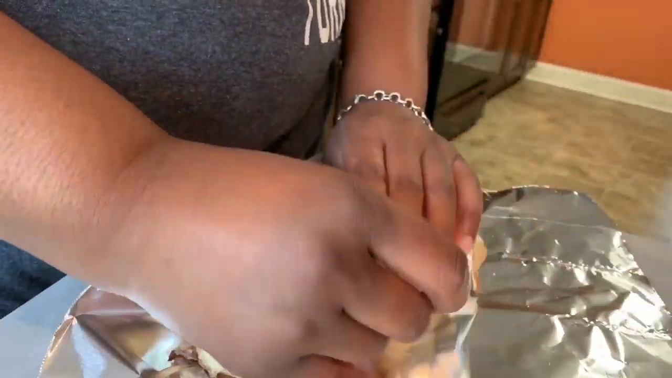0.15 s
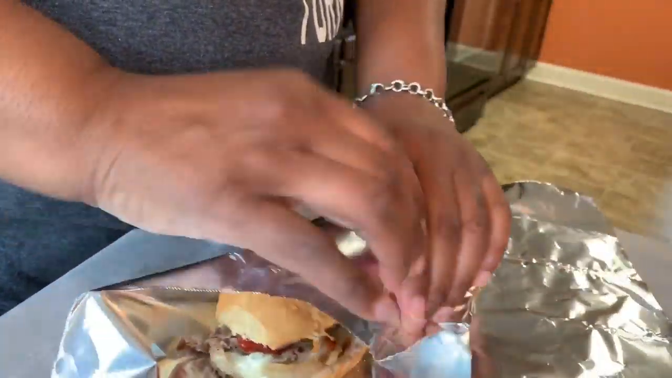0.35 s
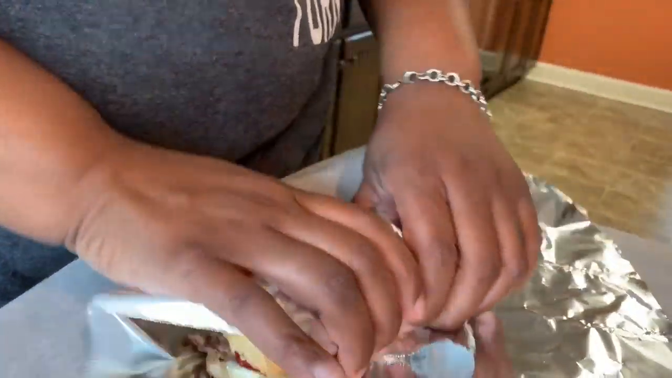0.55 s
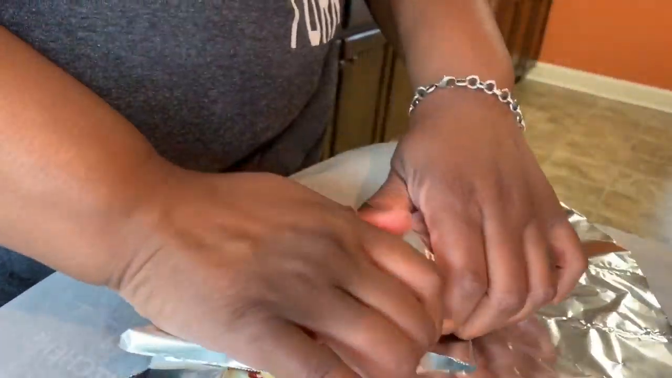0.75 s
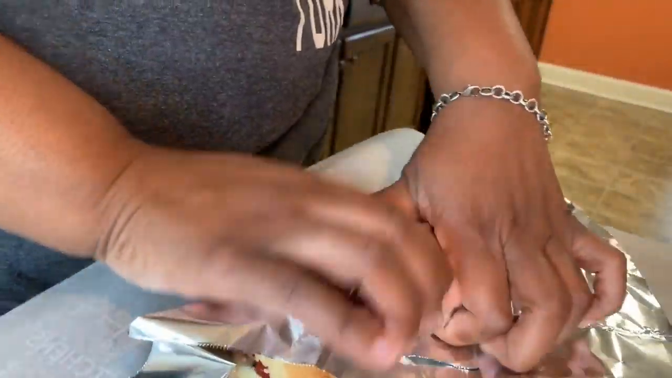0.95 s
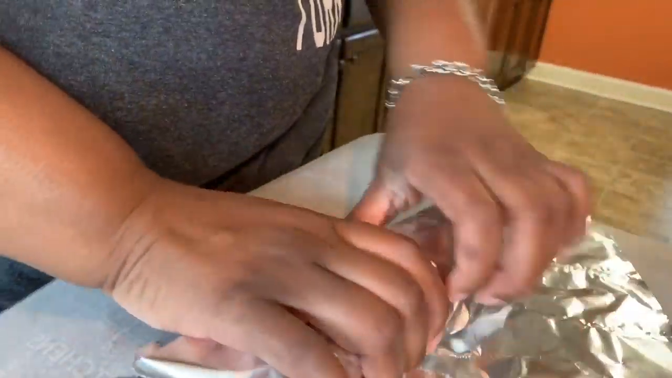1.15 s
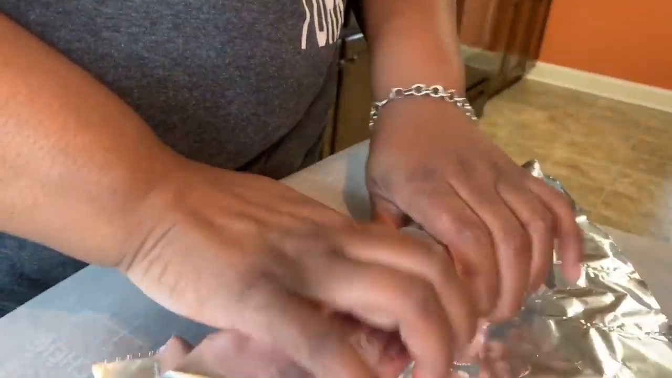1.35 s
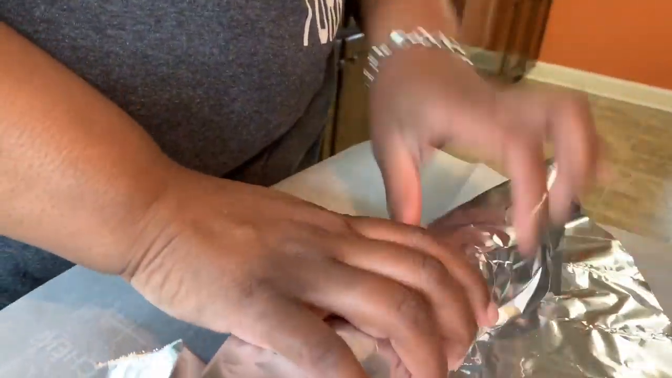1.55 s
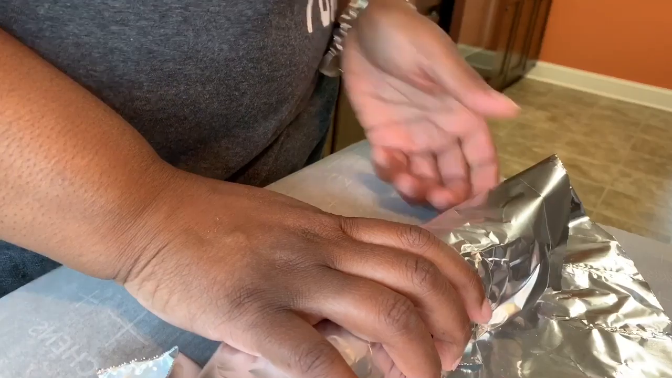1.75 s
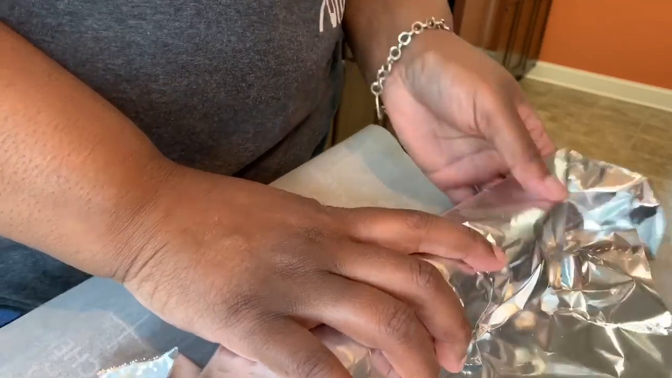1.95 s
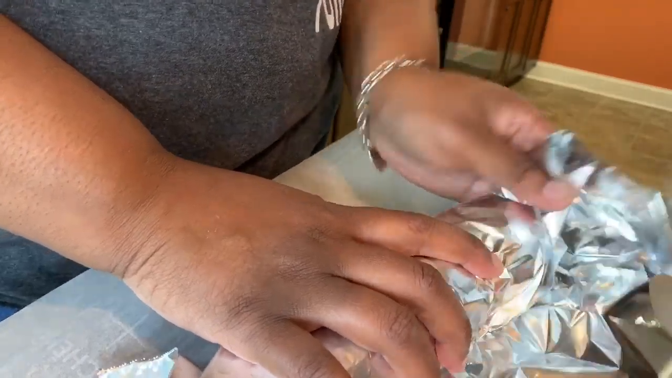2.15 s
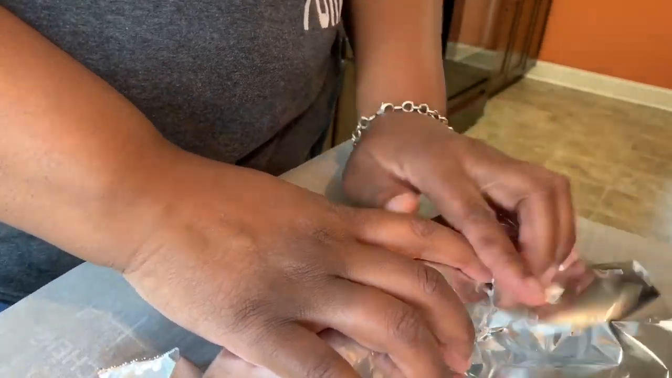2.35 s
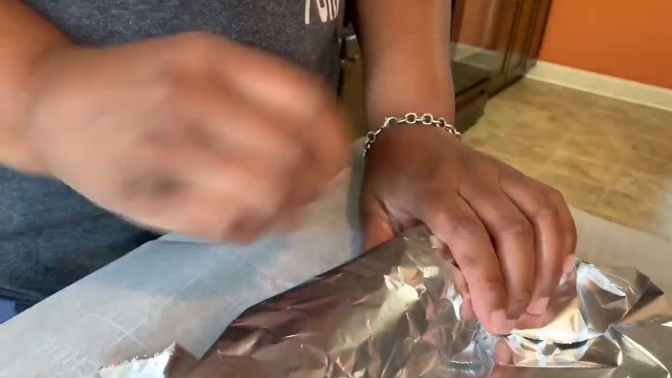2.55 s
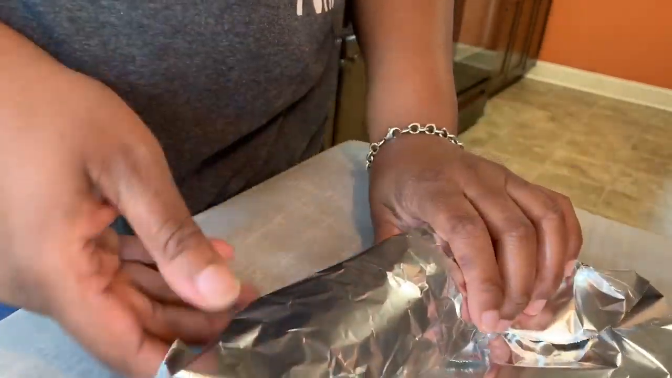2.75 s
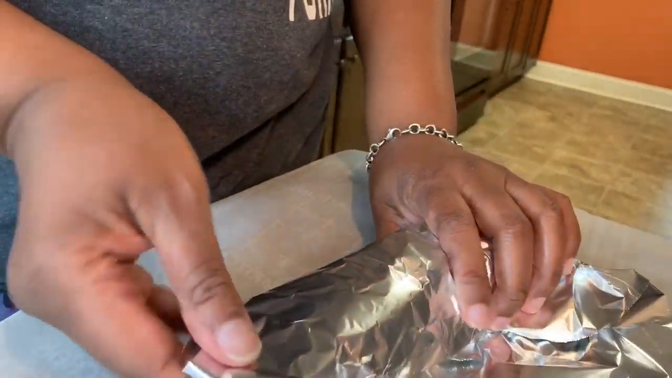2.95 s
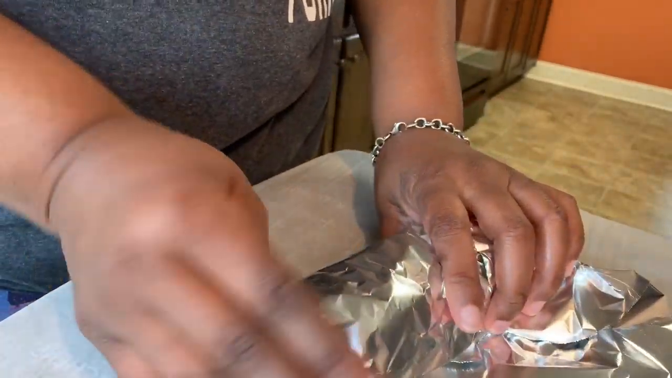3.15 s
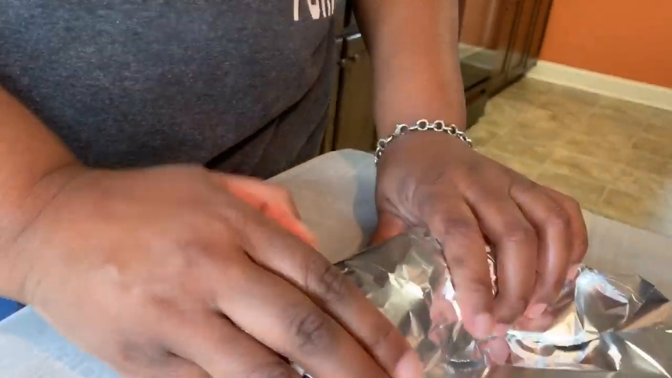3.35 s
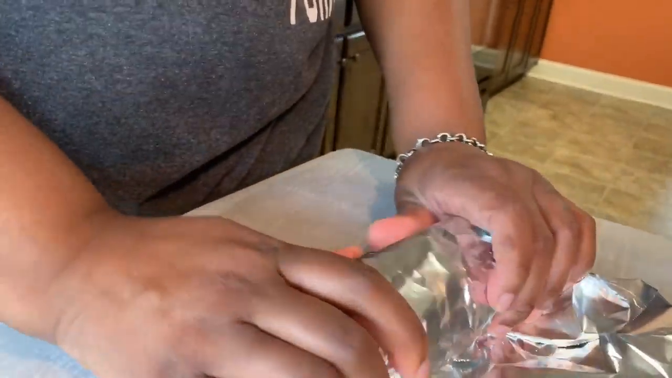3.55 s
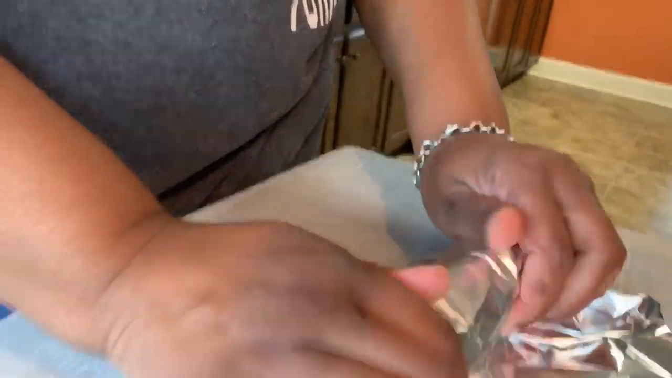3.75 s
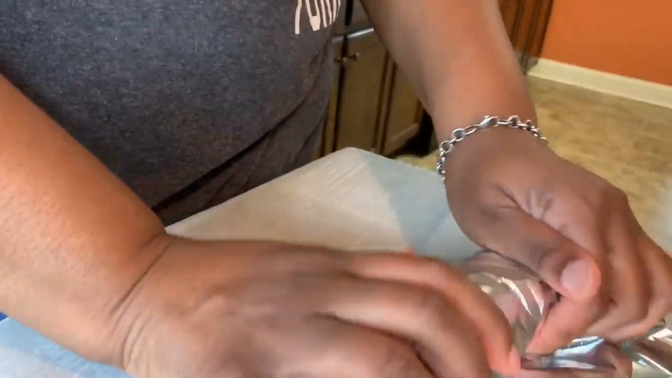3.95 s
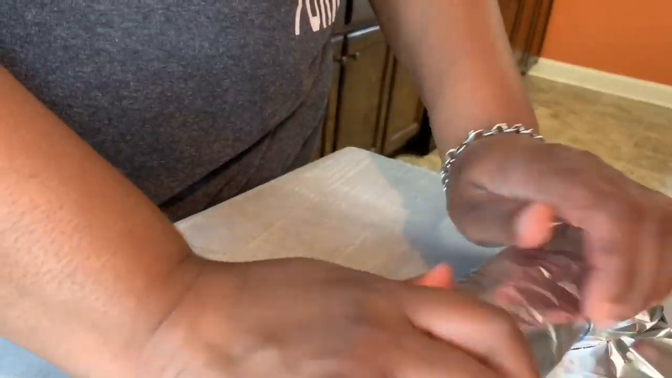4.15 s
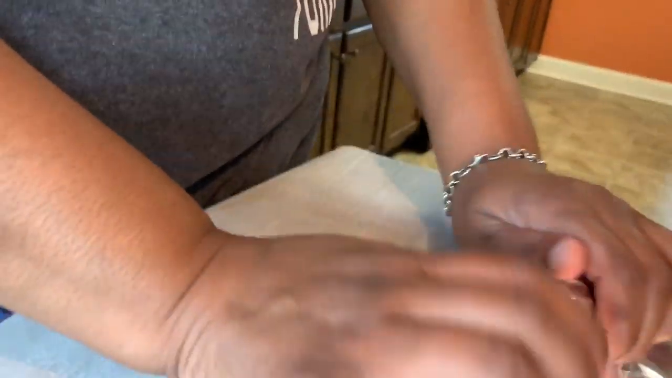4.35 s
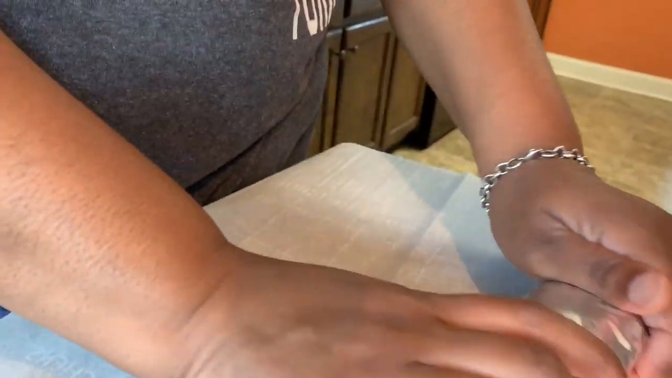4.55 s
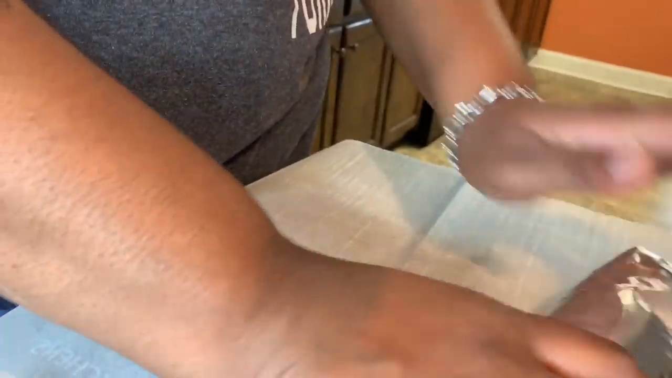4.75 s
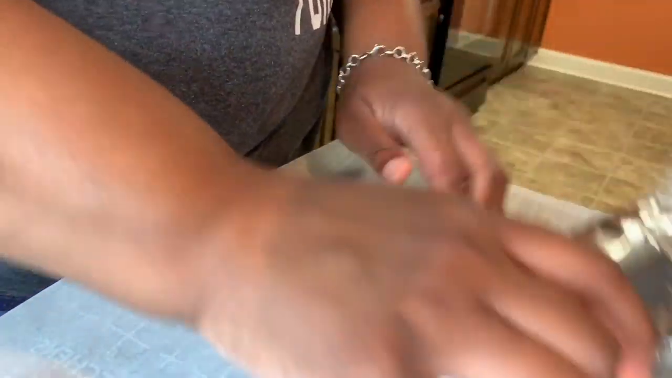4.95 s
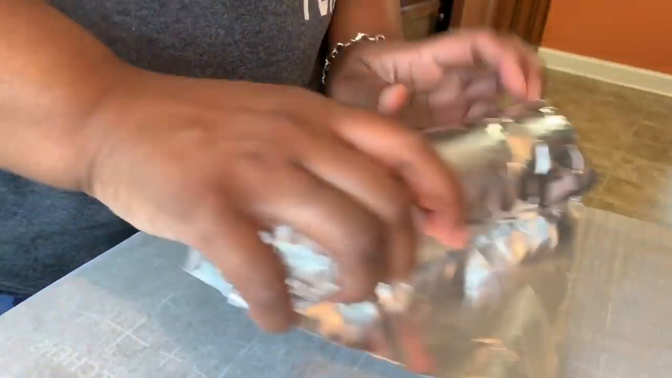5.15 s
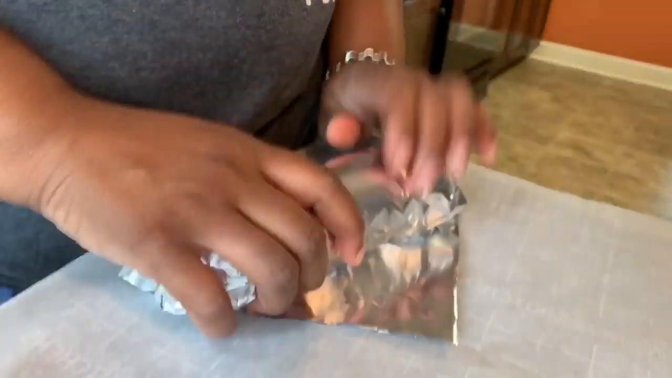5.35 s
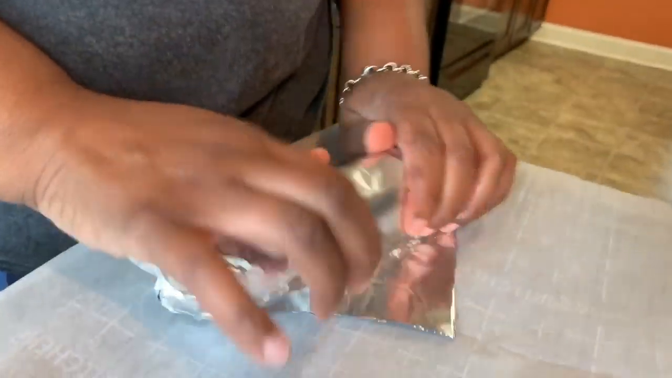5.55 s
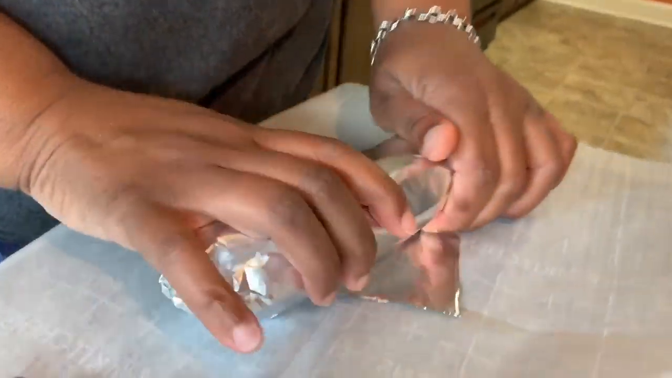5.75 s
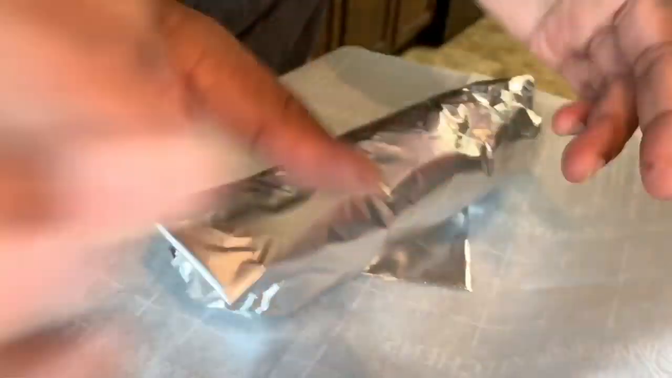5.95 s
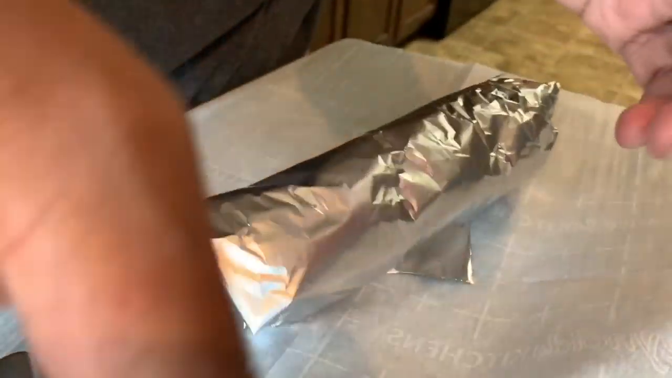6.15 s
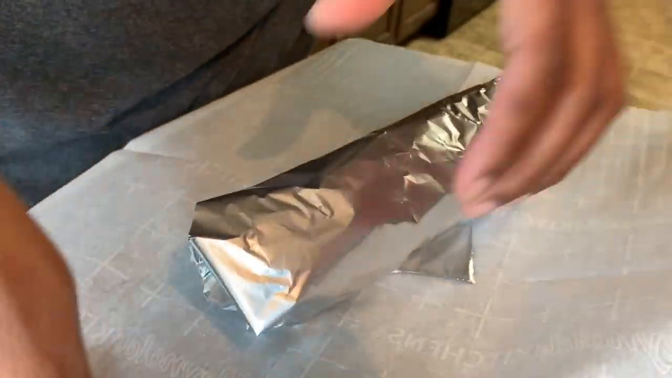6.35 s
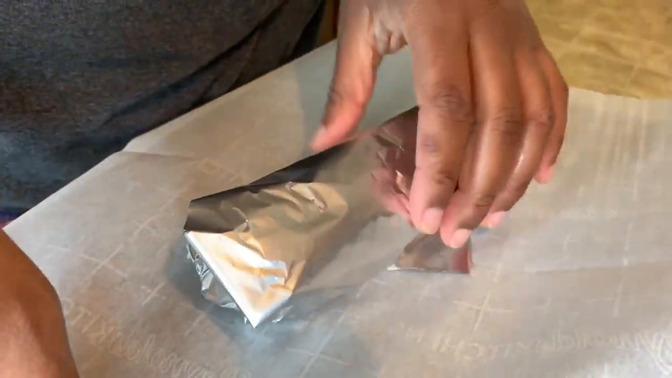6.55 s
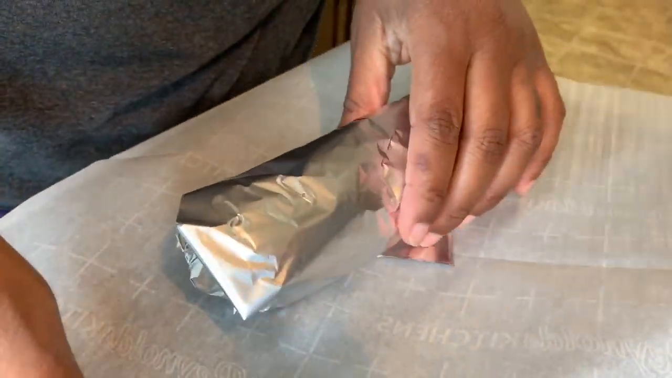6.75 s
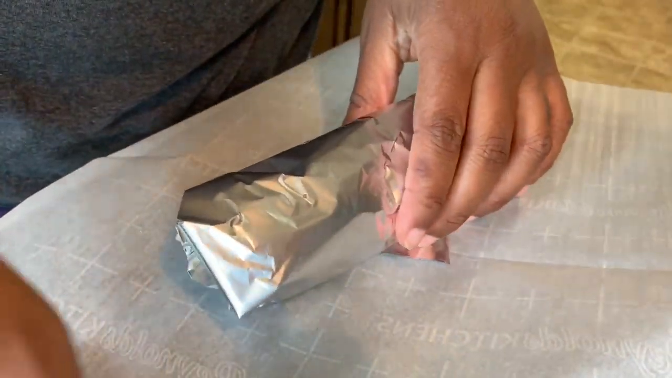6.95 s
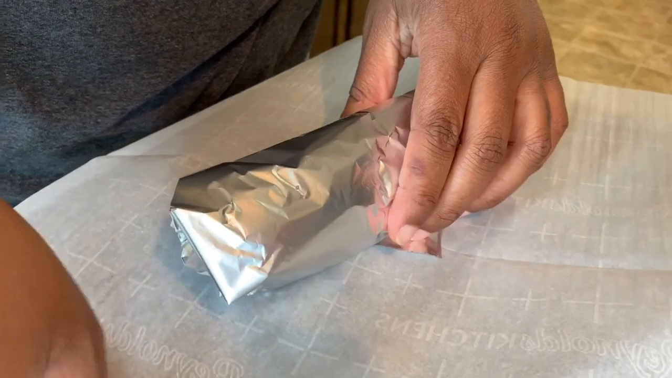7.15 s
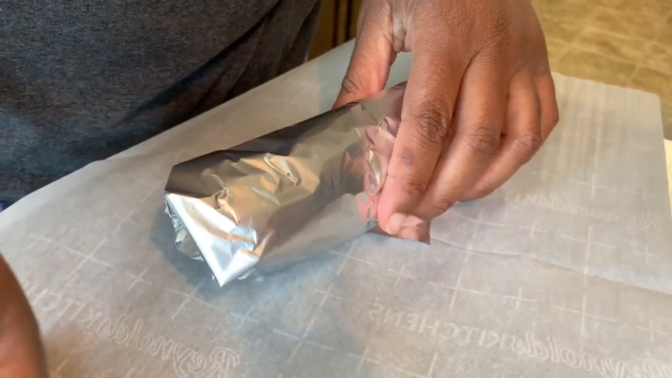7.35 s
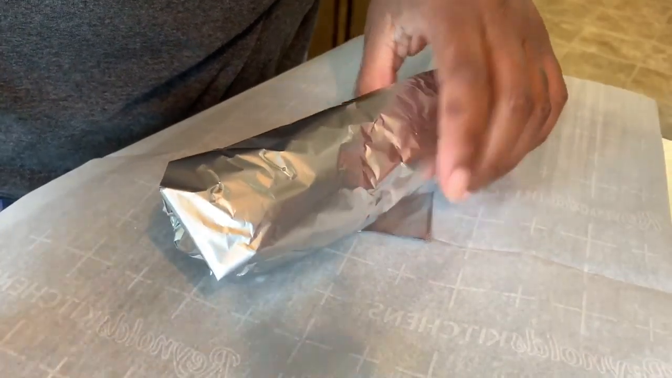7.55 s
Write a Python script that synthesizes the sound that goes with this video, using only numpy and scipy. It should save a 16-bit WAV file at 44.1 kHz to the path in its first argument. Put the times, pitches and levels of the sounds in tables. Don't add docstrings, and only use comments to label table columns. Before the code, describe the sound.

A close, thin-bassed phone microphone catches crisp metallic foil rustling from the first moment, in quick irregular bursts with strong snaps as the fingers regrip. Soft low bumps from hands on the board are barely noticeable. Later the wrapping eases to sparse ticks, short crackles and a small flurry of hollow wooden knocks, in a small quiet room with a low hum.

```python
import sys
import numpy as np
from scipy import signal
from scipy.io import wavfile
from scipy.ndimage import uniform_filter1d

SR = 44100
rng = np.random.default_rng(int(sys.argv[2]) if len(sys.argv) > 2 else 0)


def pcm_store(signal):
    levels = np.round(np.clip(np.atleast_2d(signal), -1, 1) * 32767)
    wavfile.write(sys.argv[1], SR, levels.astype(np.int16).T)


def field_ratio(decibels):
    return 10 ** (np.asarray(decibels, dtype=float) / 20)


N = 334727

# (frequency [Hz], level [dB per Hz])
FOIL_COLOUR = [(24, -73), (40, -26), (75, -18), (160, -12), (320, -16), (800, -9.5), (1400, -5.5),
               (2600, -6), (4400, -6), (5100, -4.5), (7500, -5), (10500, -5.5), (15800, -3.5)]


def evened(x):
    return x / np.sqrt(np.mean(x ** 2) + 1e-20)


def smoothed(x, size, axis=-1):
    return uniform_filter1d(uniform_filter1d(x, size, axis=axis), size, axis=axis)


def read(points, hz):
    f, value = np.transpose(points)
    return np.interp(np.log(hz + 1), np.log(f + 1), value)


def add(mix, s, sound):
    part = mix[round(s * SR):][:len(sound)]
    part += sound[:len(part)]


def coloured(x, points):
    log_gain = np.log(field_ratio(read(points, abs(np.fft.fftfreq(8192, 1 / SR)))))
    phase = -signal.hilbert(log_gain).imag
    taps = np.fft.ifft(np.exp(log_gain + 1j * phase)).real[:4096]
    return signal.oaconvolve(x, taps)[:len(x)]


def ring(x, hz, width_hz):
    r = np.exp(-np.pi * width_hz / SR)
    return signal.lfilter([1, 0, -1], [1, -2 * r * np.cos(2 * np.pi * hz / SR), r * r], x)


def clicks(per_s, spread_db, size):
    sizes = field_ratio(spread_db * np.minimum(rng.exponential(1, size), 4))
    signs = rng.choice([-1., 1.], size)
    return sizes * signs * (rng.random(size) < per_s / SR)


def buckle(kick, hz, sharpness, ring_db):
    return evened(kick) + field_ratio(ring_db) * evened(ring(kick, hz, hz / sharpness))


def dulled(x, hz):
    return signal.lfilter(*signal.butter(2, min(2.7 * hz, SR / 2.1), fs=SR), x)


def wavering():
    return evened(smoothed(rng.standard_normal(N), 4000))


def air():
    # (frequency [Hz], level [dB per Hz])
    air_colour = [(15, -48), (30, -7), (80, -6), (160, 0), (310, -3), (500, -12), (800, -12.5), (2500, -23),
                  (5100, -18), (16000, -33)]
    # (frequency [Hz], level [dB])
    hum = [(188.4, -61)]
    tone = field_ratio(-55) * evened(coloured(rng.standard_normal(N), air_colour))
    for hz, db in hum:
        loudness = field_ratio(db + 2.5 + 2.3 * wavering())
        turns = np.cumsum(hz + 2.5 * wavering()) / SR
        tone = tone + loudness * np.sin(2 * np.pi * turns)
    return tone


def creasing(low_hz, high_hz, per_s, slips_per_s, slip_s, calm, ring_db):
    slips = uniform_filter1d(abs(clicks(slips_per_s, 3.0, N)), 260)
    surge = signal.lfilter([1], [1, -np.exp(-1 / (slip_s * SR))], slips)
    surge = calm + surge / surge.mean()
    t, raw = np.arange(600) / SR, np.zeros(N)
    for hz in np.geomspace(low_hz, high_hz, num=14):
        kick = rng.standard_normal(len(t)) * field_ratio(-60 * t / rng.uniform(0.0025, 0.008))
        sparks = clicks(per_s / 14 * surge, 2.7, N)
        raw += signal.oaconvolve(sparks, buckle(kick, hz, 3.86, ring_db))[:N]
    foil = coloured(raw, FOIL_COLOUR)
    return foil / np.sqrt(smoothed(foil ** 2, 1100))


def pricks():
    t, out = np.arange(300) / SR, np.zeros(N)
    for hz in np.geomspace(1700, 11000, num=8):
        kick = rng.standard_normal(len(t)) * field_ratio(-60 * t / 0.00097)
        out += signal.oaconvolve(clicks(260 / 8, 2.0, N), buckle(kick, hz, 6.4, 2.1))[:N]
    return field_ratio(-7.5) * evened(coloured(out, FOIL_COLOUR))


def regrips(t):
    # (grip time [s], letting-go length [s], sag [dB], rebound [dB])
    grips = [(0.086, 0.15, 7, 4), (0.478, 0.046, 3.5, 5.5), (0.538, 0.026, 1.5, 11), (1.143, 0.026, 5, 2),
             (1.558, 0.11, 6, -15), (1.767, 0.09, 11.5, -6.5), (1.768, 0.023, 9.5, 4), (2.413, 0.066, 4, 2),
             (2.716, 0.026, 5.5, 1.5), (3.178, 0.16, 3.5, 8), (3.09, 0.021, 5.5, -2),
             (3.423, 0.069, 8, 5.5), (4.213, 0.029, 4, 2), (4.807, 0.057, 3.5, 1), (5.128, 0.091, 17, -1),
             (5.312, 0.041, 10.5, 8), (5.418, 0.02, 4, 3.5), (5.666, 0.029, 3.5, 9),
             (6.446, 0.12, 27, -8.5), (6.614, 0.1, 7, 2.5), (6.793, 0.093, 9.5, -16.5),
             (7.069, 0.074, 8.5, -5.5), (7.126, .02, 4, -1.5), (7.296, 0.021, 9, 5), (0.822, 0.023, 3, 2.5),
             (1.371, 0.038, 4, 0), (1.88, 0.0091, 4, 2.5), (2.78, .02, 1.5, 3.5), (3.855, 0.016, 2.5, 2.5),
             (3.998, 0.027, 3, -2), (4.079, 0.018, -1, 4), (5.82, .01, -6, 8.5), (6.848, .01, 4, 3),
             (7.584, 0.29, 12.5, -23)]
    grip_s, rebound_s = 0.021, 0.15
    out = np.zeros(len(t))
    for s, length, sag_db, rebound_db in grips:
        shut = np.clip((t - s) / grip_s, 0, 1)
        eased = np.clip((t - s + length) / (0.13 * length), 0, 1)
        out -= sag_db * eased * (1 - shut)
        out += rebound_db * shut * np.exp(-np.maximum(t - s, 0) / rebound_s)
    return out


def swells(t):
    # (time [s], length [s], change [dB])
    brief_changes = [(0.273, 0.056, 7), (0.419, 0.02, 6.5), (0.574, 0.021, 0.5), (0.667, 0.15, 2),
                     (0.893, 0.09, -1.5), (0.937, 0.027, 6), (1.28, 0.051, 3), (1.307, 0.04, -4.1),
                     (1.335, 0.04, 2), (1.364, 0.02, -3), (1.428, 0.019, 5), (1.51, 0.015, -3),
                     (1.56, 0.021, -11), (1.586, 0.044, 10.5), (1.695, 0.028, 2), (1.8, 0.017, -17),
                     (1.84, 0.025, -12), (1.89, 0.028, 3.5), (1.939, 0.053, -5), (2.164, 0.021, -6.5),
                     (2.508, 0.024, 6), (2.545, 0.028, -6), (2.617, 0.086, 4.5), (2.869, 0.022, -9),
                     (3.093, 0.021, -1), (3.119, 0.053, 5.5), (3.313, 0.024, 6.7), (3.62, 0.091, -3.5),
                     (3.685, 0.028, -5), (3.767, 0.031, 7), (3.85, 0.024, -3), (3.91, 0.028, -8),
                     (4.106, 0.042, 3), (4.175, 0.11, -2.5), (4.381, 0.035, -6), (2.346, 0.015, -5),
                     (4.61, 0.051, 3.5), (4.844, 0.024, -1.5), (4.915, 0.053, 3.5), (4.988, 0.03, -4),
                     (5.029, 0.038, -14), (5.136, 0.024, -12), (5.18, 0.074, 7.5), (5.371, 0.055, 10),
                     (5.511, 0.024, -3), (5.656, 0.027, 5), (5.826, 0.036, -14), (5.89, 0.14, 1.5),
                     (5.967, 0.084, -7), (6.213, 0.14, 10.5), (6.47, 0.061, 2), (6.866, 0.026, 7),
                     (6.888, 0.11, -9), (7.14, 0.038, 14.5), (7.334, 0.037, 9)]
    out = np.zeros(len(t))
    for s, length, db in brief_changes:
        out += db * np.cos(np.pi * np.clip((t - s) / length, -.5, .5)) ** 2
    return out


def crackle():
    # (time [s], effort [dB], loose large facets [dB], brightness of near folds [dB])
    squeeze = [(0.0, -25.5, -5, -9), (0.6, -32.5, -8, -13), (1.48, -26, -9.5, -10.5), (1.88, -21, -7.5, -7),
               (2.0, -26, -10, -13), (2.22, -22, -3, -8), (2.34, -16, -16, -16.5),
               (2.66, -31.5, -12.5, -14.5), (2.94, -21.5, -15.5, -12), (3.55, -24.5, -13.5, -13.5),
               (3.78, -20.5, -16.5, -12), (4.65, -26.5, -8, -11.5), (4.97, -28.5, -17, -12),
               (5.75, -34, -4.5, -8.5), (6.26, -59.5, -7.5, -9), (6.69, -29, -6.5, -11),
               (7.0, -43.5, -5, -14), (7.25, -32, -11, -19)]
    s, effort_db, large_db, fine_db = np.transpose(squeeze)
    small = creasing(1780, 8570, 3000, 60, 0.011, .5, -8.5)
    broad = creasing(256, 2450, 700, 40, .015, .4, 0.3)
    hz, frames, (z, flex) = signal.stft([small + pricks(), broad], SR, nperseg=256, noverlap=192)
    large = np.clip(np.log2(4000 / (hz + 1)) / 0.94, 0, 1)
    fine = np.clip(np.log2((hz + 1) / 7000), 0, 1)
    share = 0.79 * large[:, None]
    z = np.sqrt(1 - share) * z + field_ratio(-8.5) * np.sqrt(share) * flex

    grip_db = regrips(frames)
    loose_db = np.interp(frames, s, large_db + 8.5) - 0.28 * grip_db
    bright_db = np.interp(frames, s, fine_db + 5.5) + 0.24 * grip_db
    tilt_db = np.outer(large, loose_db) + np.outer(fine, bright_db)
    patches = uniform_filter1d(uniform_filter1d(rng.standard_normal(z.shape), 10, axis=0), 8, axis=1)
    tilt_db = tilt_db + 1.77 * evened(patches)
    tilted = signal.istft(z * field_ratio(tilt_db), SR, nperseg=256, noverlap=192)[1][:N]

    t = np.arange(N) / SR
    hands_db = np.interp(t, s, effort_db) + np.interp(t, frames, swells(frames)) + regrips(t)
    return tilted * field_ratio(hands_db + 1.5)


def snap(hz, t60, kick_s, ring_db, after_db):
    t = np.arange(3000) / SR
    kick = rng.standard_normal(len(t)) * field_ratio(-60 * t / kick_s) * (1 - np.exp(-t / 0.00022))
    head = buckle(kick, hz, 6.5, ring_db)
    shower = buckle(clicks(6000, 1.1, len(t)), hz, 0.96, ring_db - 1.0) * (1 - np.exp(-t / 0.0013))
    return dulled(head / abs(head).max() + field_ratio(after_db - 60 * t / t60) * shower, hz)


def buckles(rows, level_db, t60, kick_s, ring_db, after_db, top_hz=None):
    out = np.zeros(N)
    for s, db, hz in rows:
        sound = snap(hz, t60, kick_s, ring_db, after_db)
        if top_hz:
            sound = signal.lfilter(*signal.butter(1, top_hz, fs=SR), sound)
        add(out, s, field_ratio(db + level_db) * sound)
    return field_ratio(5.5) * coloured(out, FOIL_COLOUR)


def single_snaps():
    # (time [s], peak [dB], facet pitch [Hz])
    snap_rows = [(0.0179, -9, 1990), (0.2319, -13, 7300), (0.3384, -5, 4600), (1.4665, 0.5, 7500),
                 (1.4964, -11, 8000), (1.5728, -2.5, 7200), (1.6055, -2.5, 7360), (1.639, -25, 8460),
                 (1.8203, -9, 7450), (2.2014, -5, 6910), (2.806, 2, 5430), (2.9245, 0, 8050),
                 (2.9944, -4.5, 5380), (3.022, -7, 7890), (3.1775, -5, 5040), (3.2959, -3, 6500),
                 (3.4304, -6, 5600), (3.5369, -5, 7150), (3.5838, -1.5, 5940), (3.6331, 1.5, 5740),
                 (3.883, -10, 4540), (4.333, -3, 4700), (4.3996, -2.5, 6880), (4.5563, -3.5, 3040),
                 (4.6405, 0, 7260), (5.1689, -8, 4870), (5.4405, -6, 7600), (5.7319, 2, 8350)]
    return buckles(snap_rows, -7.0, 0.031, 0.45 * 0.031, 0.45, -8.0)


def showers():
    # (time [s], peak [dB], facet pitch [Hz])
    shower_rows = [(0.0974, -11, 5070), (0.1226, -6.5, 4800), (0.2816, -8, 9200), (0.474, -12, 8600),
                   (0.7613, -12, 5960), (1.04, -9, 5800), (1.0928, -9.5, 6200), (1.1589, -8, 5230),
                   (1.7783, -26, 4830), (1.8574, -9.5, 5900), (2.068, -10.5, 5270), (2.1133, -7.5, 6360),
                   (2.2328, -7.5, 6470), (2.3116, -9.5, 5200), (2.3505, -4, 6900), (2.434, -5.5, 6700),
                   (2.9491, -5.5, 6460), (3.249, -10, 5690), (3.5588, -10, 5660), (3.658, -5.5, 6160),
                   (3.7454, -6, 6030), (3.9466, -8.5, 5860), (4.0147, -7.5, 8600), (4.4685, -6.5, 5860),
                   (4.5856, -9, 3500), (5.0, -13.5, 3650), (5.151, -15.5, 4900), (5.323, -7.5, 6050),
                   (5.704, -8, 4950), (5.8177, -8.5, 4400)]
    return buckles(shower_rows, -7.0, 0.14, 0.45 * 0.14, 0.45, -8.0)


def pops():
    # (time [s], peak [dB], dent pitch [Hz])
    pop_rows = [(0.489, -18.5, 4020), (0.613, -24, 1600), (0.684, -16.5, 2310), (0.125, -14, 1310),
                (1.034, -22, 1820), (1.086, -21, 2310), (1.273, -22, 2580), (1.582, -24.5, 1430),
                (2.181, -15, 1030), (2.211, -13, 774), (2.244, -15, 2660), (2.611, -26.5, 1410),
                (2.864, -17, 2750), (2.906, -25, 2170), (2.934, -21, 1640), (3.02, -20.5, 2040),
                (3.146, -19.5, 2430), (3.249, -19.5, 1740), (3.323, -22, 2340), (3.358, -22, 2540),
                (3.645, -20, 1830), (3.684, -15, 2020), (4.113, -20, 2420), (4.556, -16.5, 1360),
                (5.004, -24, 545)]
    return buckles(pop_rows, 6.0, 0.02, 0.0053, 5.4, -18)


def needles():
    # (time [s], peak [dB], facet
    # or dent pitch [Hz])
    squeezed = [(0.254, -13, 2500), (0.2329, -8, 6900), (0.3212, -5.5, 4700), (0.4, -10, 10600),
                (4.0245, -1.5, 6000), (0.866, -5, 8000), (1.2796, -7, 2680), (1.309, -10.5, 2900),
                (1.3919, -8.5, 3100), (1.6072, 1, 7460), (1.641, -7, 8800), (1.7113, -22, 7100),
                (1.7294, -24, 2800), (0.402, -13, 1800), (1.7922, -17, 11300), (2.048, -8, 5400),
                (4.036, -3, 7000), (2.301, -13, 5900), (2.381, -11, 6600), (2.6664, -21, 5300),
                (2.6847, -12, 6800), (2.796, -9, 5500), (2.863, -10, 2900), (2.9954, -16, 5600),
                (3.0363, -14, 5900), (3.0533, -10, 7000), (3.066, -5, 8100), (3.0832, -12, 7900),
                (3.0982, -5.5, 6500), (3.5763, -5, 6000), (3.587, -15, 5700), (3.7774, -1, 8850),
                (3.964, -17, 8100), (4.047, -8, 6100), (4.1934, -10, 9200), (4.4897, -4, 9100),
                (4.4992, -5, 5160), (4.5047, -4, 8500), (4.518, -18, 9000), (4.5287, -6, 4800),
                (4.5615, -7, 3500), (4.6472, -7, 7100), (4.7043, -7, 5000), (4.7493, -7, 5400),
                (4.755, -9, 7100), (4.81, -14, 9350), (4.8163, -11, 3300), (5.368, -3.5, 2900),
                (5.467, -22, 6900), (5.532, -5.5, 4200), (5.5733, -9, 9500), (5.6315, -8, 6970),
                (5.6485, -14, 4700), (5.666, -15, 4600), (5.7334, -3, 5140), (5.4358, 1.5, 2900),
                (5.8575, -9, 5100), (5.873, -12, 4100)]
    # (time [s], peak [dB], facet pitch [Hz])
    settling = [(6.0068, -22, 5600), (6.0195, -27, 4900), (6.026, -12.5, 9000), (6.047, -18, 4700),
                (6.0664, -30, 4900), (6.0732, -25, 5500), (6.113, -19, 5000), (6.148, -22, 9000),
                (6.2363, -23, 1870), (6.3538, -35, 4200), (6.4159, -37, 3900), (6.4478, -43, 6000),
                (6.5089, -32, 4300), (6.548, -23, 1500), (6.581, -18, 4280), (6.6214, -12, 2600),
                (6.6634, -20, 7100), (6.671, -11, 4370), (6.6785, -11, 11300), (6.728, -23, 4000),
                (6.7554, -9.5, 4170), (6.8392, -14.5, 5000), (6.8474, -26, 8100), (6.8611, -31, 1500),
                (6.7028, -11, 7000), (6.8846, -20.5, 3500), (6.9165, -13, 3600), (6.4902, -30, 7000),
                (6.9592, -29, 3100), (6.5275, -20, 9000), (6.5785, -16, 8500), (7.138, -11, 2900),
                (7.1714, -29, 4600), (7.1939, -24, 4200), (7.1989, -26, 5800), (7.3201, -16, 4000),
                (7.3266, -21, 2900), (7.3553, -26, 3700), (7.3655, -28, 3200), (7.3807, -27, 1500),
                (7.3905, -22, 9000), (7.3967, -9, 4170), (7.425, -20, 1700), (7.4722, -21, 8600),
                (7.4853, -19, 9300), (7.497, -24, 2500), (7.5219, -33, 5900), (7.5618, -24, 5400)]
    t, out = np.arange(900) / SR, np.zeros(N)
    for rows in (squeezed, settling):
        for s, db, hz in rows:
            kick, spray = rng.standard_normal((2, len(t)))
            head = buckle(kick * field_ratio(-60 * t / 0.006), hz, 5.3, -5)
            tail = buckle(spray, hz, 2.1, 0.5) * field_ratio(-9 - 60 * t / 0.01)
            add(out, s, field_ratio(db - 4.0) * dulled(head / abs(head).max() + tail, hz))
    return field_ratio(5.0) * coloured(out, FOIL_COLOUR)


def dry_clicks():
    # (time [s], peak [dB], facet pitch [Hz])
    click_rows = [(0.3675, -19, 4960), (0.685, -21, 4730), (0.779, -21, 5950), (0.943, -34, 6250),
                  (0.9648, -17, 7300), (1.505, -15.5, 3030), (1.6243, -19, 8400), (0.416, -14.5, 8700),
                  (2.088, -5.5, 6950), (2.179, -9.5, 3900), (3.078, -11, 8550), (3.1064, -16, 5070),
                  (4.362, -14.5, 6000), (4.673, -11, 7500), (4.684, -10.5, 4530), (4.699, -14.5, 5260),
                  (4.7395, -12.5, 3570), (5.029, -15, 4260), (5.0526, -27, 3690), (5.34, -17, 6200),
                  (5.7415, -8, 8250), (5.7493, -13, 5400), (5.9546, -18.5, 4500), (5.9645, -22, 7410),
                  (7.343, -22, 3650), (7.348, -20, 3100)]
    return buckles(click_rows, 6.5, 0.004, 0.0045, -1.6, -20)


def bumps():
    # (time [s], peak [dB], pitch [Hz], time to fall 60 dB [s])
    bump_rows = [(.62, -43, 110, 0.072), (1.87, -48, 80, 0.092), (2.267, -37, 118, 0.057),
                 (3.28, -49, 70, .08), (3.775, -45, 80, 0.11), (5.012, -38, 333, 0.05),
                 (5.021, -47, 80.5, .1), (5.35, -54, 80, .1), (5.891, -25.5, 390, 0.02),
                 (5.93, -36, 246, 0.037), (5.95, -48, 75, .12), (5.976, -30.5, 503, 0.016),
                 (6.041, -37, 500, 0.046)]
    t, out = np.arange(8000) / SR, np.zeros(N)
    for s, db, hz, t60 in bump_rows:
        shape = (1 - np.exp(-t * hz / 1.3)) * field_ratio(-60 * t / t60)
        wave = np.sin(2 * np.pi * hz * (t - 2.4 * t ** 2))
        wave += 0.63 * np.sin(2 * np.pi * 0.75 * hz * t)
        add(out, s, field_ratio(db) * shape / shape.max() * wave)
    return out


def tucked_ticks():
    # (time [s], peak [dB], facet pitch [Hz])
    tuck_rows = [(6.0973, -31, 1750), (6.379, -34, 5140), (6.5275, -15.5, 4100), (6.5944, -24, 2870),
                 (6.6056, -20, 2720), (6.6201, -21, 2250), (6.7022, -11, 2520), (6.752, -14.5, 9000),
                 (6.787, -24, 9150), (6.8151, -21, 6000), (6.9097, -24.5, 7040), (6.9344, -29, 2250),
                 (6.9464, -33, 4320), (7.093, -16.5, 6100), (7.133, -23, 3050), (7.2681, -24, 2850),
                 (7.2828, -16, 3200), (5.437, -13, 1180), (5.446, -15, 1670), (7.4852, -25, 1890),
                 (7.5692, -24, 4890), (7.5824, -28, 2700)]
    return buckles(tuck_rows, 2.0, 0.015, 0.0066, 4, -8.5, top_hz=6000)


def bare_ticks():
    # (time [s], peak [dB], facet pitch [Hz])
    tick_rows = [(5.8463, -11, 4760), (5.9055, -11.5, 5130), (5.9397, -11.5, 5300), (5.985, -14.5, 8100),
                 (5.999, -15, 5170), (6.0555, -14.5, 6150), (6.1074, -22, 1540), (6.1366, -29, 6500),
                 (6.1705, -21, 6100), (6.1755, -15.5, 3240), (6.218, -24, 4710), (6.2514, -30, 4160),
                 (6.2673, -24, 5380), (6.2812, -12, 6060), (6.4604, -31, 8500), (6.4935, -17.5, 8900),
                 (6.634, -17, 11000), (6.648, -12.5, 3170), (6.688, -10, 4750), (6.7393, -25, 5000),
                 (7.308, -21, 9000), (7.334, -23, 8000), (7.3894, -19, 2150), (7.4372, -11.5, 5300),
                 (7.4685, -18.5, 7500), (7.491, -22, 9000), (7.5158, -14.5, 5400), (7.5552, -28, 2870)]
    return buckles(tick_rows, 2.0, 0.015, 0.0066, -7.5, -8.5, top_hz=20000)


def knocks():
    # (time [s], peak [dB], pitch woken most by the spot struck [Hz])
    blows = [(7.067, -31, 406), (7.084, -24, 490), (7.094, -25.5, 740), (7.103, -44, 680),
             (7.112, -27, 277), (7.121, -27, 626), (7.134, -26.5, 276), (7.148, -31, 280),
             (7.164, -41, 746), (7.194, -42, 280), (7.227, -36, 270), (7.252, -36.5, 270),
             (7.380, -28.5, 990), (7.385, -24.5, 447), (7.387, -24.5, 268), (7.433, -38, 268)]
    # (frequency [Hz], level [dB], time to fall 60 dB [s])
    wood_modes = [(133, 11, 0.081), (275.4, -4.5, 0.11), (334, -2.5, 0.021), (447, -7, 0.042),
                  (656, -1, 0.097), (794, -17, 0.033), (920, -11, 0.11), (1143, -8, 0.078),
                  (1276, 5.5, 0.027)]
    reach_octaves = 0.6
    t, out = np.arange(12000) / SR, np.zeros(N)
    for s, db, spot_hz in blows:
        blow = rng.standard_normal(len(t)) * field_ratio(-60 * t / 0.0088)
        blow = uniform_filter1d(blow, size=14)
        for hz, mode_db, t60 in wood_modes:
            mode = ring(blow, hz * rng.uniform(0.935, 1.03), 1.43 / t60)
            far_db = 10.3 * (np.log2(hz / spot_hz) / reach_octaves) ** 2
            add(out, s, field_ratio(db - 2.0 + mode_db - far_db) * mode / abs(mode).max())
    return out


def kitchen(x):
    # (frequency [Hz], time to fall 60 dB [s])
    echo_times = [(200, 0.52), (1500, 0.3), (6000, 0.077), (14000, 0.041)]
    taps = np.zeros(SR // 2)
    at = np.arange(120, len(taps) - 20, 20)
    taps[at + rng.integers(0, 20, len(at))] = rng.choice([-1., 1.], len(at))
    hz, t, z = signal.stft(taps, SR, nperseg=256)
    fade = field_ratio(-60 * t / read(echo_times, hz)[:, None])
    tail = signal.istft(z * fade, SR, nperseg=256)[1]
    return signal.fftconvolve(x, tail / np.linalg.norm(tail))[:N]


def scene():
    foil = crackle() + single_snaps() + showers() + pops() + needles() + dry_clicks()
    foil = foil + tucked_ticks() + bare_ticks()
    near, wood = foil + bumps(), knocks()
    echoes = kitchen(field_ratio(-17.0) * near + field_ratio(-9.0) * wood)
    return (near + wood + echoes + air())[None]


def low_pass(x):
    return signal.sosfilt(signal.butter(12, 16970, fs=SR, output="sos"), x)


def record(dry):
    thin = signal.sosfilt(signal.butter(1, 45, "high", fs=SR, output="sos"), dry)
    held = np.tanh(thin)
    treble_cut = signal.firwin(701, 15850, window=("kaiser", 7), fs=SR)
    limited = signal.oaconvolve(held, treble_cut[None], "same")
    return low_pass(limited)


dry = scene()
out = record(dry)
pcm_store(out)
```